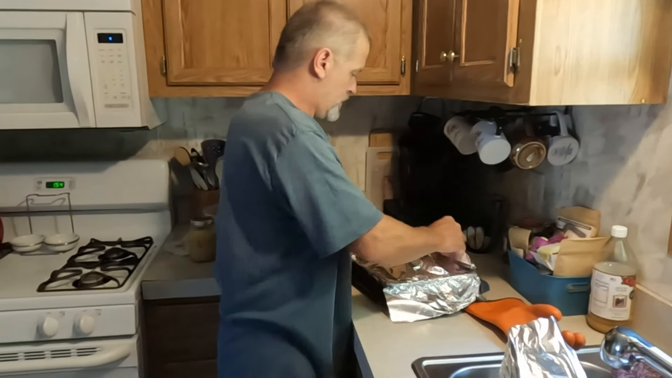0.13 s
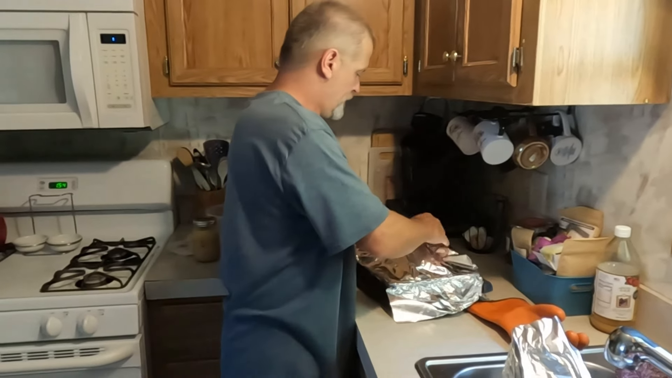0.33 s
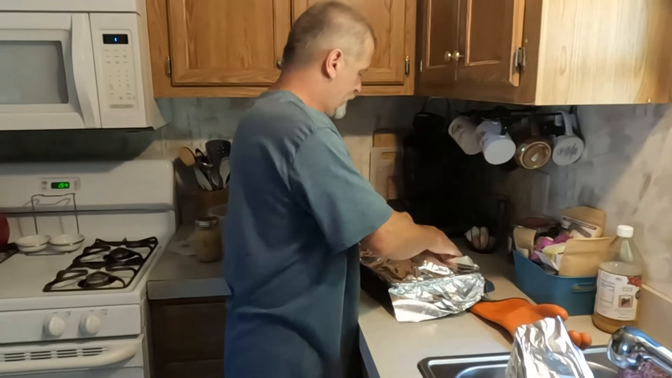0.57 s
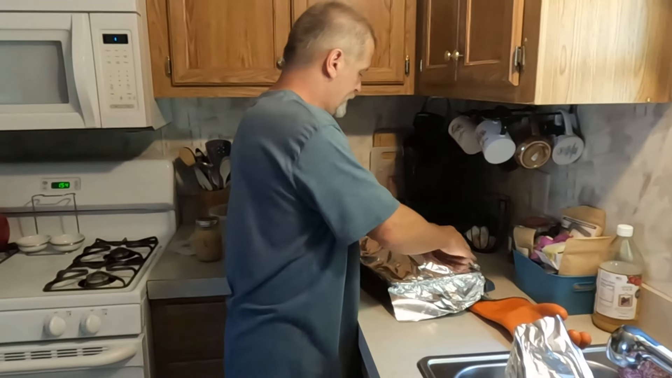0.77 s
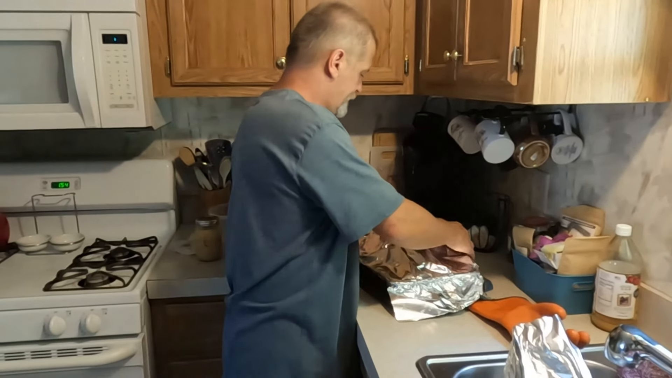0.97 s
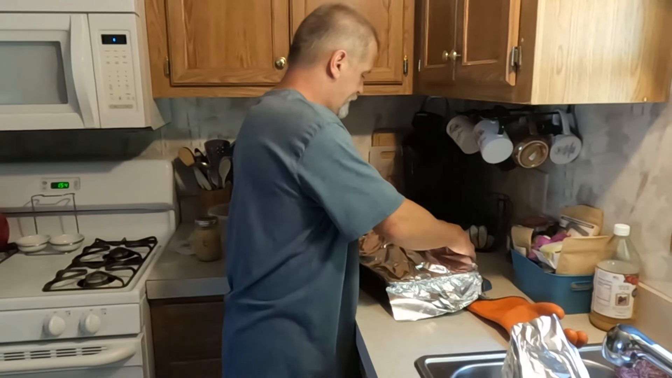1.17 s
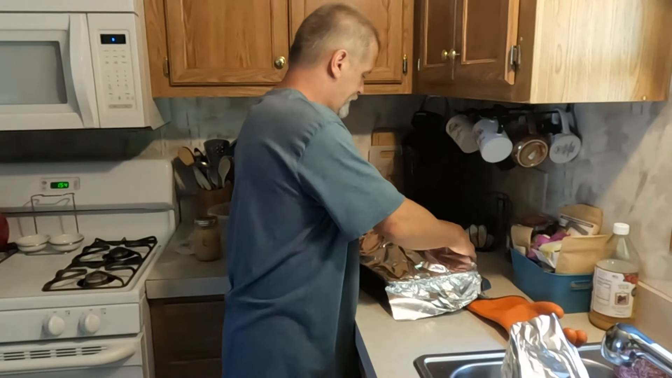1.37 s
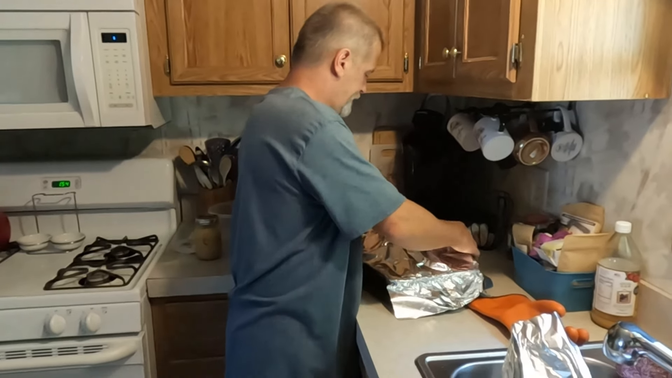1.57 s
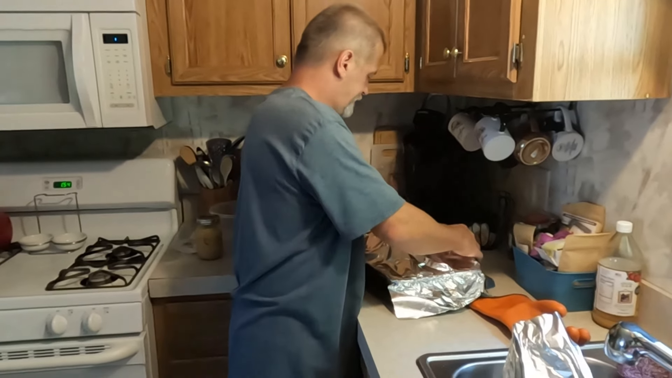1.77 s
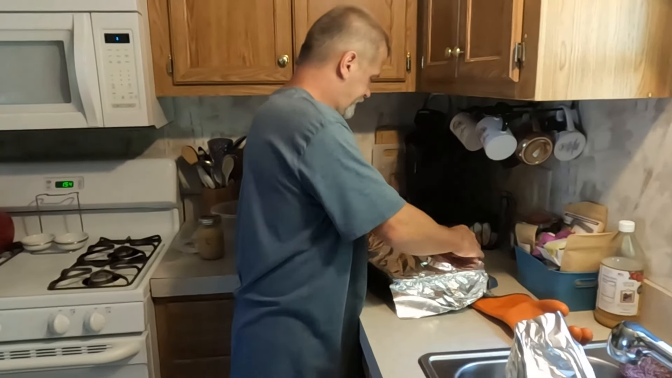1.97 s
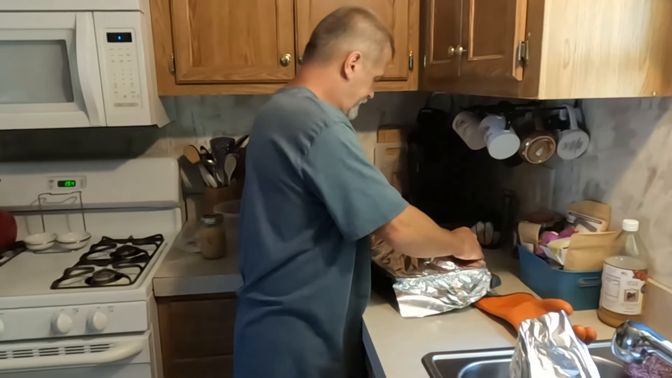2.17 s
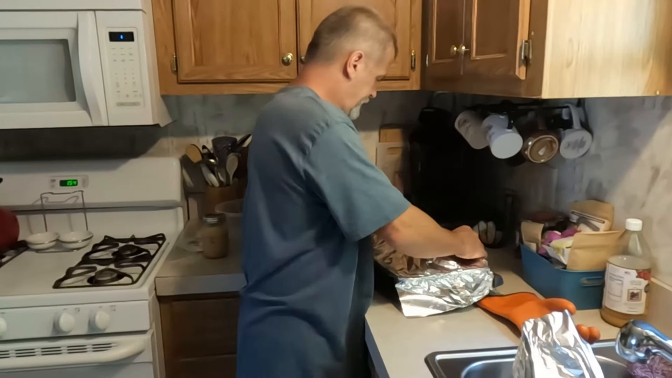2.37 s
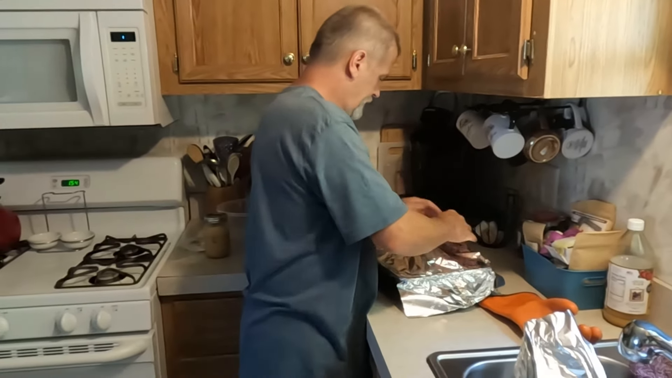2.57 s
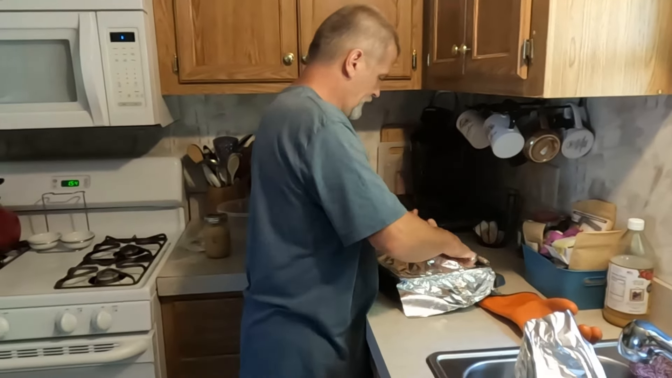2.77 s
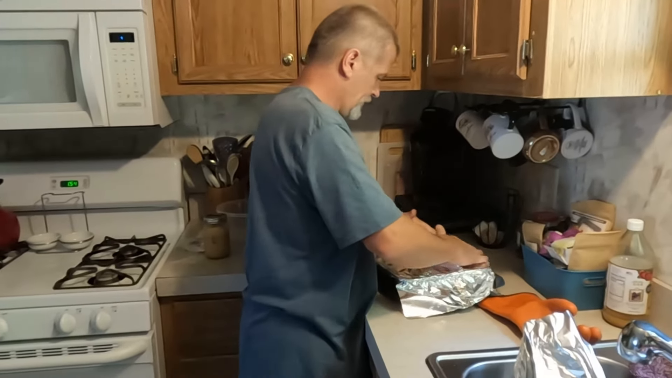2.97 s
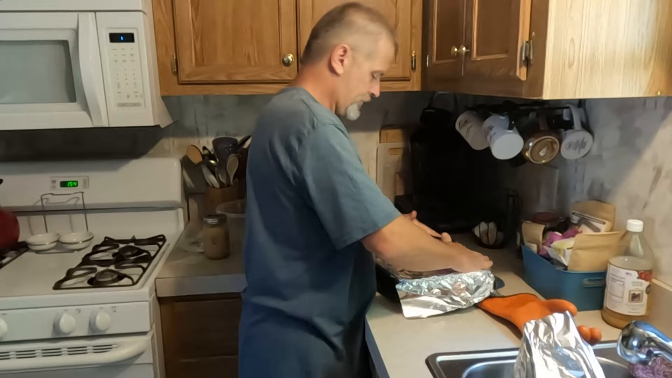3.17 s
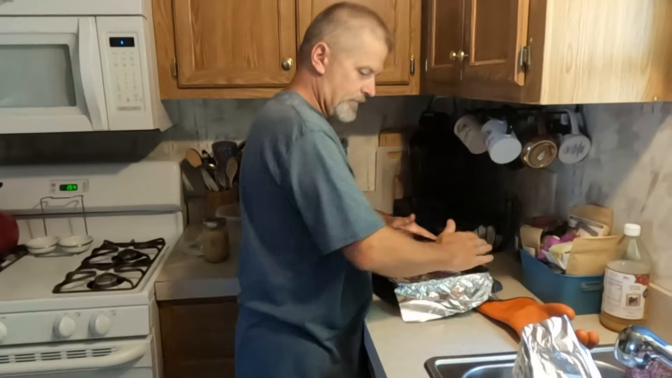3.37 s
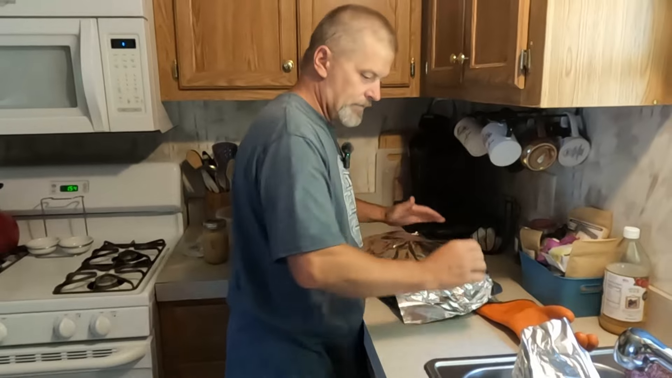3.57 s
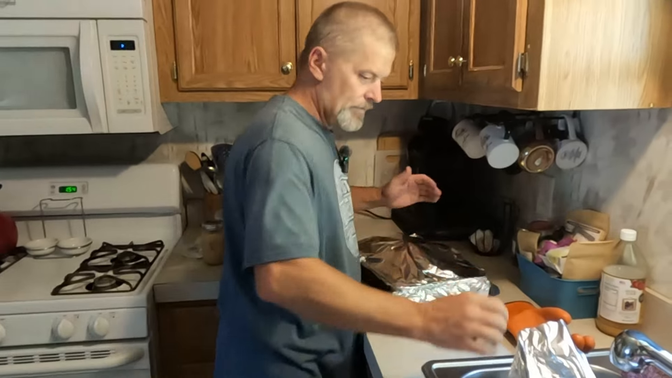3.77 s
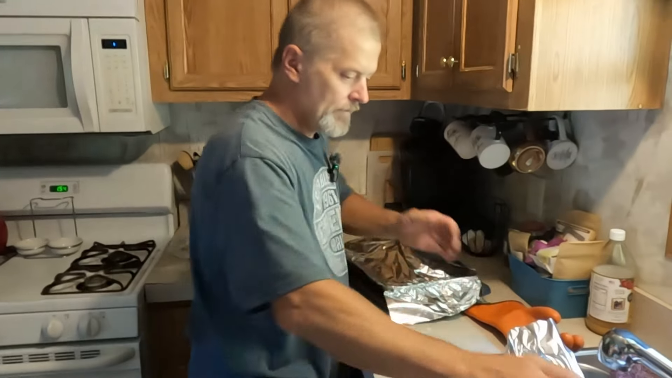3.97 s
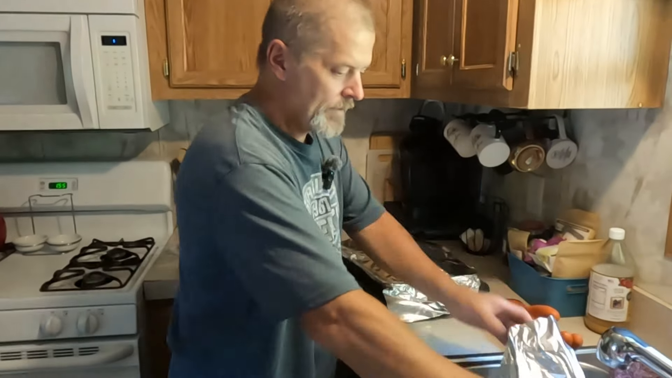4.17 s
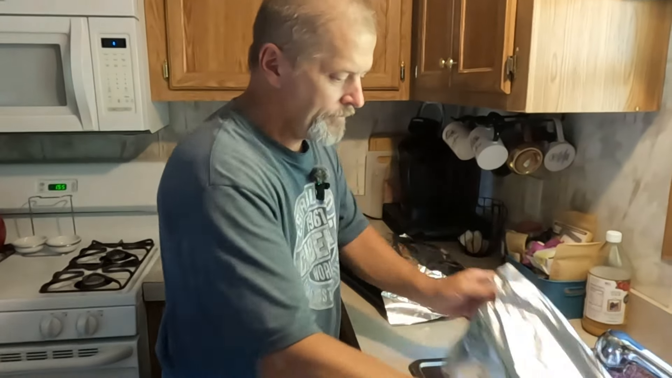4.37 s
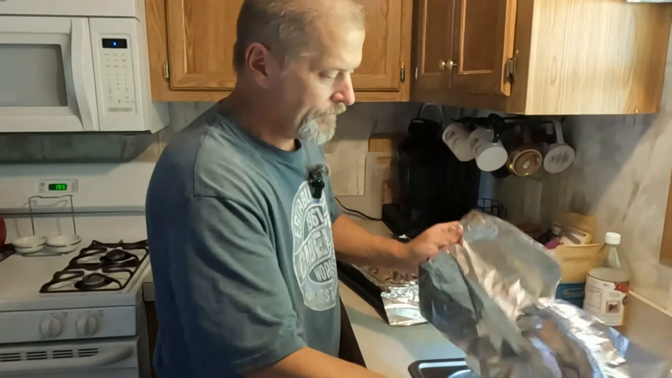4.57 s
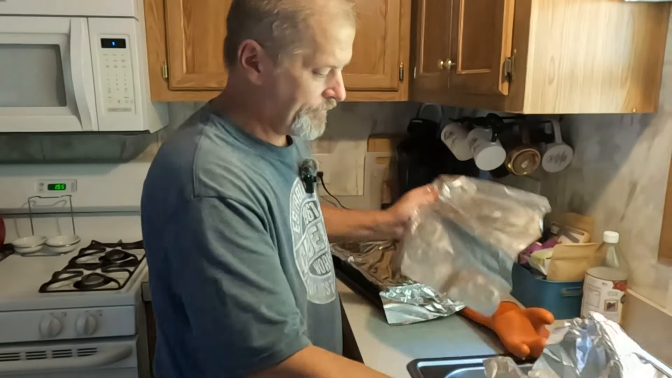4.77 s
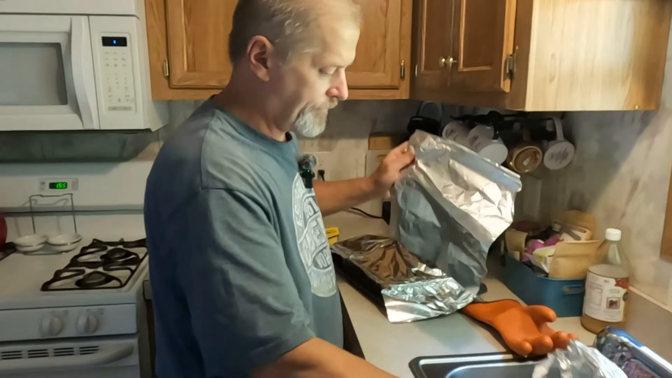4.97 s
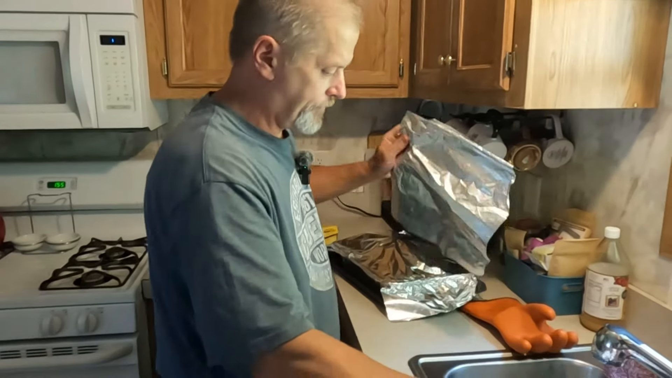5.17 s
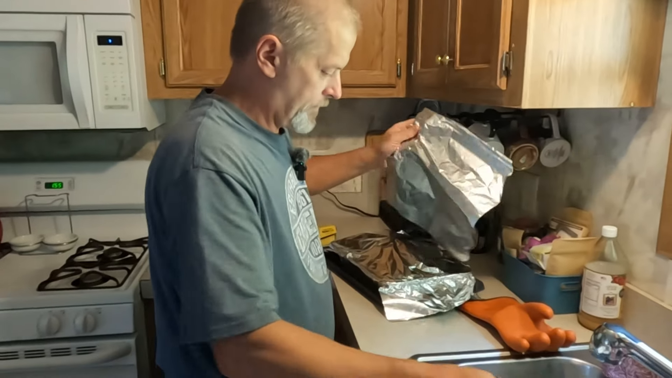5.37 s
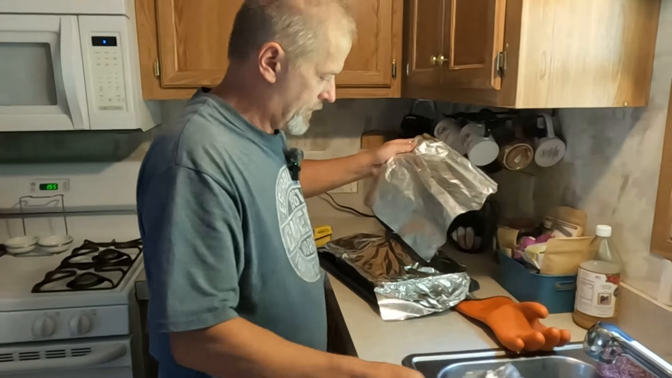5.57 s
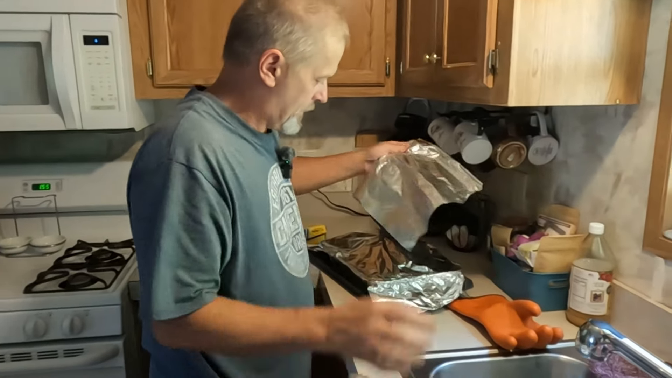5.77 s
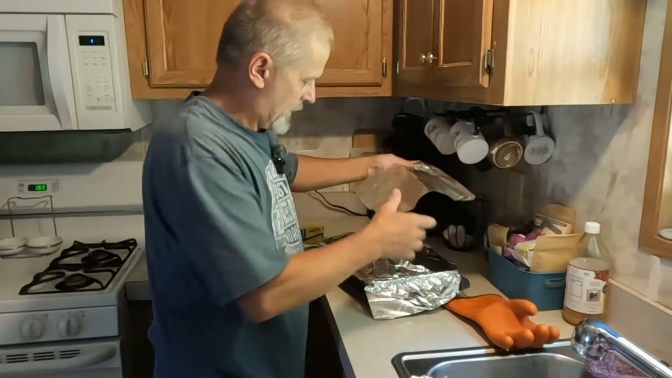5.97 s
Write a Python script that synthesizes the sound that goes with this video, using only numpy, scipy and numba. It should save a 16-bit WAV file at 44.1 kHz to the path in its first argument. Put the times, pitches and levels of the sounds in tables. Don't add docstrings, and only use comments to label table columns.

```python
import sys
import numpy as np
from scipy import signal
from scipy.fft import rfft, irfft
from scipy.io import wavfile
from scipy.ndimage import uniform_filter1d
from numba import njit

SR = 44100
rng = np.random.default_rng(int(sys.argv[2]) if len(sys.argv) > 2 else 0)


def gain_from_decibels(decibels):
    exponent = np.asarray(decibels, float) / 20
    return 10 ** exponent


def inscribe(sig):
    pcm = np.round(np.clip(np.atleast_2d(sig).T, -1, 1) * 32767)
    wavfile.write(sys.argv[1], SR, pcm.astype(np.int16))


N = 264908


def level(x):
    return x / np.sqrt(np.mean(x ** 2))


def curves(table):
    s, *columns = np.transpose(table)
    return [np.interp(np.arange(N) / SR, s, c) for c in columns]


def colour(x, points, lo_hz=0, top_hz=SR):
    hz = np.arange(N // 2 + 1) * SR / N + 1
    points_hz, points_db = np.transpose(points)
    db = np.interp(np.log(hz), np.log(points_hz), points_db)
    edges = 1 / np.sqrt((1 + (lo_hz / hz) ** 12) * (1 + (hz / top_hz) ** 12))
    return level(irfft(rfft(x) * gain_from_decibels(db) * edges, N))


def walk(rate_hz):
    hold = int(SR / rate_hz)
    steps = np.repeat(rng.standard_normal(400), hold)[:N]
    return level(uniform_filter1d(steps, hold))


@njit
def rings(start, hz, t60, size, count):
    out = np.zeros(count)
    for k in range(len(start)):
        turn = np.exp(2j * np.pi * hz[k] / SR - np.log(1000.) / (t60[k] * SR))
        z = size[k] + 0j
        for i in range(start[k], min(start[k] + int(t60[k] * SR), count)):
            z *= turn
            out[i] += z.imag
    return out


# (frequency [Hz], density [dB per Hz])
MIC_RESPONSE = [(300, -18), (760, -10.5), (1750, -7.5), (2300, -5), (3750, 2), (5300, 3), (6600, 7),
                (7650, -1), (8650, 8), (9500, -9), (11200, -15), (13700, -9.5), (15000, -12), (15900, -23)]


def swarm(lo_hz, top_hz, flat_hz=None, cycles=18, run_s=.04, scatter_db=1.5, crease_db=2.0, detune=0.013):
    crease, buckle = rng.random((3000, 3, 1)), rng.random((3000, 4, 12))
    first = (np.arange(len(crease))[:, None] + crease[:, 0]) * N / len(crease) - run_s * SR / 2
    start = np.clip(first + run_s * SR * buckle[:, 0] ** 2, 0, N - 1).astype(int)
    if flat_hz is None:
        hz = lo_hz * (top_hz / lo_hz) ** crease[:, 1]
    else:
        hz = flat_hz[start]
    hz = hz * (1 + detune * (2 * buckle[:, 1] - 1))
    luck_db = -crease_db * np.log(0.075 + crease[:, 2]) - scatter_db * np.log(0.0048 + buckle[:, 2])
    size = gain_from_decibels(luck_db) * np.sign(buckle[:, 3] - .5) * np.sqrt(hz)
    ringing = rings(start.ravel(), hz.ravel(), cycles / hz.ravel(), size.ravel(), N)
    return colour(ringing, MIC_RESPONSE, lo_hz, top_hz)


def moves(table, attack_db_s, release_db_s, middle_db, boom_db):
    s, hold_s, db, breadth_db, crisp_db = np.transpose(table)
    t = np.arange(0, N + 64, 64) / SR
    early = np.maximum(s[:, None] - t, 0)
    late = np.maximum(t - (s + hold_s)[:, None], 0)
    shares_db = [middle_db + 0.23 * breadth_db, breadth_db, 0 * db, crisp_db,
                 boom_db + 2 * breadth_db]
    swell = gain_from_decibels(-attack_db_s * early - release_db_s * late)
    power = gain_from_decibels(db + np.array(shares_db)) ** 2 @ swell ** 2
    return np.array([np.interp(np.arange(N) / SR, t, p) for p in power])


# (time [s], hold [s], small facets [dB], breadth: large facets re small [dB],
# crispness: finest creases re small [dB])
RIM_PINCHES = [(0.0, 0.05, -40.5, -18, -4.5), (0.105, 0.14, -26.5, -9, -8),
               (0.187, 0.043, -24, -20.5, -3.5), (0.375, 0.18, -31, -12, -6.5),
               (0.62, 0.15, -33, -11, -7.5), (0.79, 0.12, -42.5, -2, -9.5), (0.94, 0.099, -47, 2, -12),
               (1.03, 0.062, -32.5, -8.5, -11.5), (1.145, 0.064, -42, -2, -1.5),
               (1.32, 0.028, -54.5, 1, -11), (1.55, 0.14, -53.5, -7, -3.5), (1.71, 0.069, -32, -5.5, -5),
               (1.86, 0.05, -42, -4, -6), (1.935, 0.098, -25.5, -8.5, -6.5), (2.07, 0.1, -23, -4, -4.5),
               (2.2, 0.063, -34, -3, -5.5), (2.305, 0.076, -32.5, -4, -4.5), (2.51, 0.07, -42.5, 3, -3.5),
               (2.595, 0.036, -52, 2, -11), (2.775, 0.021, -85, 12, -12), (2.91, 0.068, -34, -0.5, -11.5),
               (3.185, 0.059, -35, -1.5, -4), (3.28, 0.059, -53, 5, -12), (3.57, 0.13, -61.5, 7, -9.5)]


def pinches():
    return moves(RIM_PINCHES, attack_db_s=743.5, release_db_s=540, middle_db=2, boom_db=-8.5)


def pan_body(pinched):
    body = swarm(370, 690, np.full(N, 575.), cycles=11, detune=0.074)
    return gain_from_decibels(-24) * np.sqrt(pinched[2]) * body


# (time [s], small facets [dB])
SETTLING = [(0, -50.5), (0.3, -52.5), (0.6, -51), (1.0, -60.5), (1.43, -61), (1.6, -53), (2.45, -62),
            (2.7, -79), (2.9, -54), (3.35, -62.5), (3.5, -67), (3.92, -70.5), (4.3, -97), (4.4, -56.5),
            (5.1, -52.5), (5.3, -60), (5.6, -57), (6.01, -54.5)]
SETTLING_SHARES_DB = [2, 4, 2.5, -7, 1.5]


def settling():
    return gain_from_decibels(curves(SETTLING)[0] + np.array(SETTLING_SHARES_DB)[:, None]) ** 2


# (time [s], share [dB], frequency [Hz])
FLAT_FACET = [(0, -0.5, 1694), (0.55, 2.5, 1663), (0.68, 2.5, 1820), (0.95, -14, 1690), (1.15, 5.5, 1780),
              (1.3, 2, 1770), (1.6, -6, 1510), (2.25, -2, 1740), (2.35, 2, 1410), (2.7, -6, 1500),
              (3.3, -10, 1670), (5.5, -6.5, 1620), (5.7, 2, 1570), (6.01, 5, 1590)]


def flat_facet(lo_hz, top_hz):
    share_db, hz = curves(FLAT_FACET)
    return gain_from_decibels(share_db) * swarm(lo_hz, top_hz, hz, cycles=49, detune=0.039)


# (time [s], level [dB])
ROOM_FLOOR = [(0.0, -48.5), (1.5, -50.5), (2.1, -49), (2.6, -50.5), (3.2, -48.5), (3.6, -55), (3.95, -62),
              (4.12, -61), (4.27, -60.5), (4.34, -48.5), (4.9, -49.5), (5.05, -49.5), (5.3, -53.5),
              (5.6, -52.5), (6.01, -47.5)]
# (frequency [Hz], width [Hz], level [dB])
FRIDGE_LINES = [(57.5, 7.3, 1), (116.3, 6.4, 0.5), (170, 14, -5.5)]
# (frequency [Hz], density [dB per Hz])
ROOM_AIR = [(12, -47.5), (20, 8), (141, -4.5), (247, -7.5), (526, -7), (588, -9), (2250, -18),
            (3140, -19.5), (4650, -25), (8600, -28.5), (15900, -32.5)]


def kitchen():
    floor_db, = curves(ROOM_FLOOR)
    motor = np.zeros(N)
    for hz, width_hz, db in FRIDGE_LINES:
        line = signal.lfilter(*signal.iirpeak(hz, hz / width_hz, SR), rng.standard_normal(N))
        motor += gain_from_decibels(db) * level(line)
    rumble = colour(rng.standard_normal(N), ROOM_AIR, 18, 330)
    air = colour(rng.standard_normal(N), ROOM_AIR, 210)
    air_db = -1 + 2.0 * walk(8)
    return gain_from_decibels(floor_db) * (gain_from_decibels(2.5) * level(motor) + gain_from_decibels(-1.5) * rumble + gain_from_decibels(air_db) * air)


# (low [Hz], top [Hz])
FACET_BANDS_HZ = [(2700, 5300), (950, 2700), (5300, 9400), (9400, 15900)]
# (time [s], peak [dB], facet [Hz], length [ms]); cracks cross many facets
CRACK_FOLDS = [(0.4472, -12, 6570, 19), (0.593, -31, 1710, 30), (0.6389, -19, 3740, 41),
               (0.7173, -20.5, 3920, 35), (1.6627, -27, 4100, 23), (1.709, -22.5, 4960, 62),
               (1.856, -40, 8500, 16), (1.915, -25, 4000, 130), (1.9843, -8.5, 3640, 25),
               (2.057, -20, 6100, 19), (2.0916, -12.5, 8850, 22), (2.188, -16.5, 4320, 32),
               (2.229, -14, 7060, 11), (2.296, -23.5, 8600, 33), (2.593, -25, 5040, 27),
               (2.9086, -34, 8700, 48), (2.9237, -19.5, 3700, 42), (3.1698, -50, 6420, 29),
               (3.191, -23, 8800, 38), (4.2926, -28, 7000, 28), (4.5655, -4.5, 5950, 8.2),
               (4.6929, -11, 7030, 107)]
SINGING_FOLDS = [(0.091, -27, 5360, 64), (0.1025, -24, 8620, 67), (0.1855, -16.5, 3760, 16),
                 (0.3566, -41, 5500, 24), (0.4949, -19.5, 3640, 26.5), (0.608, -35.5, 1760, 35),
                 (0.8874, -35.5, 4530, 25), (0.9907, -36.5, 4450, 13), (1.0158, -34, 3940, 63),
                 (1.0526, -23.5, 1720, 22.4), (1.1426, -40, 8300, 59), (1.8863, -35, 8620, 50),
                 (2.3101, -20, 1517, 13), (2.5017, -45, 3780, 120), (4.2812, -53, 1014, 32),
                 (4.305, -18, 6900, 160), (4.5254, -23.5, 8400, 76), (5.4595, -36.5, 6630, 58),
                 (5.5473, -36, 6200, 15), (5.6157, -46, 6340, 90), (5.712, -35, 1560, 13.5),
                 (5.7413, -38.5, 6200, 61), (5.875, -27, 3610, 93), (5.9, -20, 1484, 31)]
SQUEAK_FOLDS = [(1.0036, -44, 4450, 55), (1.323, -36, 3230, 27), (1.86, -51, 2230, 43),
                (5.5837, -46.5, 6780, 24), (5.825, -35, 1380, 16), (5.831, -42.5, 1578, 81)]
# (time [s], peak [dB], facet [Hz])
TICK_FOLDS = [(1.4622, -37, 3810), (1.5599, -43, 3460), (2.7054, -51, 2480), (2.7257, -44, 3540),
              (2.8524, -42.5, 3550), (3.07, -37, 3810), (3.3435, -59, 3970), (3.53, -48, 4000),
              (3.604, -41.5, 4700), (5.2588, -42, 8800), (5.37, -43.5, 6600)]


def folds(sharpness=25.0, reach_db=1.0):
    burst, song = np.zeros((4, N)), np.zeros(N)
    t = np.arange(SR // 4) / SR
    rise = 1 - np.exp(-t / .0025)
    centres_hz = np.sqrt(np.prod(FACET_BANDS_HZ, axis=1))[:, None]
    rows = [(*r, -13.5) for r in CRACK_FOLDS]
    rows += [(*r, -4) for r in SINGING_FOLDS]
    rows += [(*r, 6) for r in SQUEAK_FOLDS]
    rows += [(*r, 29, -11) for r in TICK_FOLDS]
    for s, peak_db, hz, length_ms, song_db in rows:
        shape = gain_from_decibels(peak_db) * rise * np.exp(-(1000 * t / max(length_ms, 3)) ** 1.4)
        q = sharpness * min(1, (3300 / hz) ** 1.2)
        facet = signal.iirpeak(hz, q, SR)
        shaken = signal.lfilter(*facet, signal.lfilter(*facet, rng.standard_normal(len(t))))
        i = int(s * SR)
        reach = gain_from_decibels(-reach_db * np.abs(np.log2(hz / centres_hz)))
        burst[:, i:i + len(t)] += reach * shape[:N - i]
        song[i:i + len(t)] += (gain_from_decibels(song_db + 0.5) * shape * level(shaken))[:N - i]
    return burst, song


# (time [s], peak [dB], frequency [Hz])
LONE_SNAPS = [(0.1032, -14, 8560), (1.0525, -17, 1750), (1.0664, -16, 3990), (1.7704, -18, 4930),
              (1.9824, -7, 3660), (2.0004, -8, 6540), (2.1274, -11, 3130), (2.9248, -15, 3680),
              (4.8034, -4, 6490), (5.9054, -11, 1570)]


def snaps():
    s, peak_db, hz = np.transpose(LONE_SNAPS)
    start, size = (s * SR).astype(int), gain_from_decibels(peak_db + 7)
    return rings(start, hz, 14 / hz, size, N) - rings(start, hz, 5 / hz, size, N)


# (time [s], peak [dB], frequency [Hz], t60 [s])
PAN_KNOCKS = [
    (1.04, -36.5, 459, 0.28),
    (2.313, -33.5, 777, 0.16),
    (2.769, -34, 341, 0.18),
    (2.77, -42, 995, 0.05),
    (2.784, -29.5, 294, 0.11),
    (2.785, -43, 1390, 0.04),
    (2.909, -36.5, 570, 0.16),
    (3.227, -28, 972, 0.056),
]


def pan():
    s, peak_db, hz, t60_s = np.transpose(PAN_KNOCKS)
    start = (s * SR).astype(int)
    low = rings(start, hz, t60_s, gain_from_decibels(peak_db), N)
    overtone = rings(start, 2.1 * hz, .5 * t60_s, gain_from_decibels(peak_db - 8), N)
    return low + overtone


SHEET_FLAPS = [(4.292, 0.068, -32.5, 3, -6.5), (4.345, 0.048, -14, -1.5, -6),
               (4.435, 0.029, -16.5, -3, -6.5), (4.51, 0.044, -25.5, -1.5, -9),
               (4.585, 0.093, -20, -3.5, -6.5), (4.655, 0.03, -18, -3.5, -14),
               (4.695, 0.073, -14.5, 0, -10), (4.75, 0.084, -15, -4, -5), (4.8, 0.099, -19.5, -7.5, -7),
               (4.91, 0.024, -24.5, -8, -19), (4.99, 0.055, -34, -9, -31)]


def flaps():
    return moves(SHEET_FLAPS, attack_db_s=1307, release_db_s=246, middle_db=-3, boom_db=-8)


# (time [s], level [dB])
AIR_WHUMPS = [
    (4.31, -49),
    (4.38, -35.5),
    (4.46, -52),
    (4.74, -39.5),
    (4.8, -34.5),
    (4.85, -40.5),
    (5.93, -52),
]


def whumps():
    swing = np.zeros(N)
    for s, db in AIR_WHUMPS:
        swing += gain_from_decibels(db) * np.exp(-((np.arange(N) / SR - s) / 0.032) ** 2)
    return swing * colour(rng.standard_normal(N), MIC_RESPONSE, 144, 310)


def sheet(boom, flapped):
    bend = gain_from_decibels(-3.5) * swarm(460, 1000, np.full(N, 679.), cycles=17, detune=0.21)
    return gain_from_decibels(-3) * boom * swarm(324, 1120, cycles=18) + np.sqrt(flapped[4]) * bend + whumps()


SHEET_TURNS = [
    (5.455, 0.025, -43.5, -35, -15),
    (5.545, 0.026, -41.5, -44, -13),
    (5.6, 0.057, -50, -34, -16),
    (5.705, 0.11, -51.5, -0.5, -8),
    (5.82, 0.03, -43, -2.5, -12),
    (5.89, 0.04, -33.5, -2.5, -7),
]


def turns():
    return moves(SHEET_TURNS, attack_db_s=700, release_db_s=266, middle_db=7, boom_db=-14)


# (frequency [Hz], level [dB])
EDGE_ON = [(900, -1), (2500, 1.5), (3600, 0.5), (5000, -5), (6400, 4), (8500, -1), (13000, -1)]
KICK_DB = [-12.5, -15.5, -11.5, -7]


def crackle(facets, burst, turned_power):
    patchy_db = 1.0 * np.array([walk(25) for _ in FACET_BANDS_HZ])
    hands = gain_from_decibels(-5 + 1.36 * walk(35) + patchy_db)
    work = (hands + gain_from_decibels(np.array(KICK_DB))[:, None] * burst / facets[2]) * facets
    middle, large, small, fine = FACET_BANDS_HZ
    large_swarm = gain_from_decibels(-2.0) * (swarm(*large) + flat_facet(*large))
    swarms = [swarm(*middle), large_swarm, swarm(*small), swarm(*fine)]
    whole = np.sum(work * swarms, axis=0)
    turned = whole * turned_power / facets[2] ** 2
    return whole - turned + np.std(turned) * colour(turned, EDGE_ON)


def foil():
    pinched, flapped, turned = pinches(), flaps(), turns()
    *facets, boom = np.sqrt(pinched + flapped + turned + settling())
    burst, song = folds()
    crackling = crackle(facets, burst, turned[2])
    return crackling + song + snaps() + pan_body(pinched) + sheet(boom, flapped)


def room(x):
    t60_s, tail_db = 0.081, -11.5
    t = np.arange(SR // 2) / SR
    tail = rng.standard_normal(len(t)) * 1000. ** (-t / t60_s) * (t > .002)
    tail /= np.sqrt(np.sum(tail ** 2))
    return x + gain_from_decibels(tail_db) * signal.fftconvolve(x, tail)[:N]


def scene():
    capsule = gain_from_decibels(-71) * colour(rng.standard_normal(N), [(2000, -8), (10000, -3.5)], 2500)
    mid = room(foil() + pan()) + kitchen() + capsule
    follow = np.sqrt(uniform_filter1d(np.diff(mid, prepend=0) ** 2, 1024) + 1e-12)
    hiss_points = [(300, -3), (1200, 0), (3000, 1.5), (5600, 5), (9000, 0), (14000, -2)]
    hiss = colour(rng.standard_normal(N), hiss_points, 250)
    side = gain_from_decibels(-25) * follow * hiss + gain_from_decibels(-22) * kitchen()
    return np.array([mid + side, mid - side])


def roll_off(x):
    return signal.sosfilt(signal.butter(12, 16050, fs=SR, output="sos"), x)


def record(dry):
    mix = 0.68 * np.tanh(dry / 0.93)
    return roll_off(mix)


dry = scene()
out = record(dry)
inscribe(out)
```